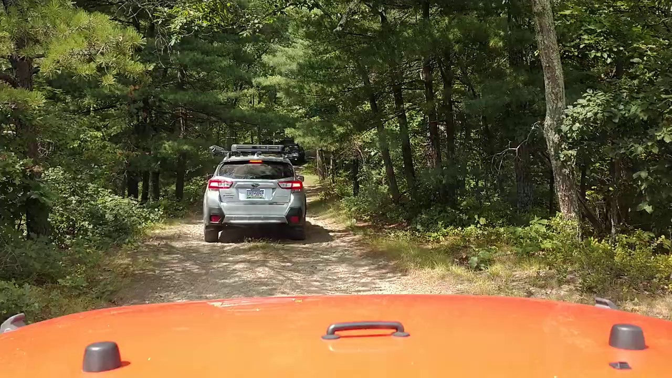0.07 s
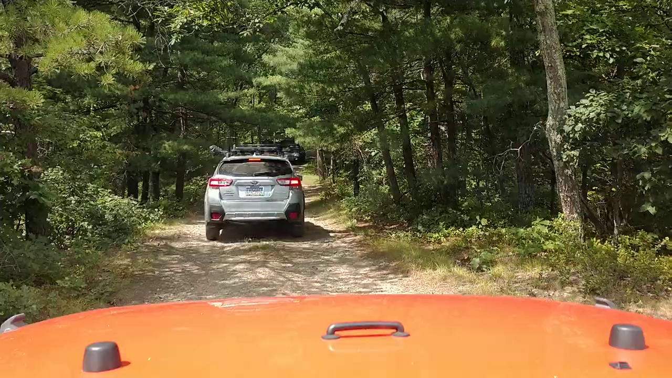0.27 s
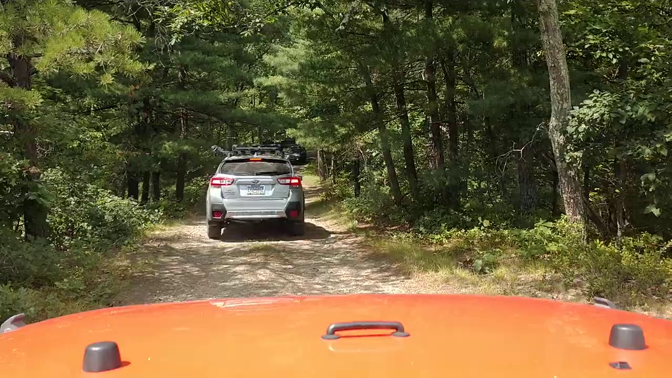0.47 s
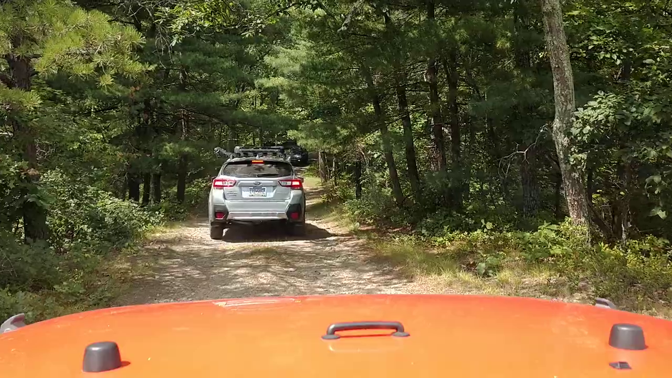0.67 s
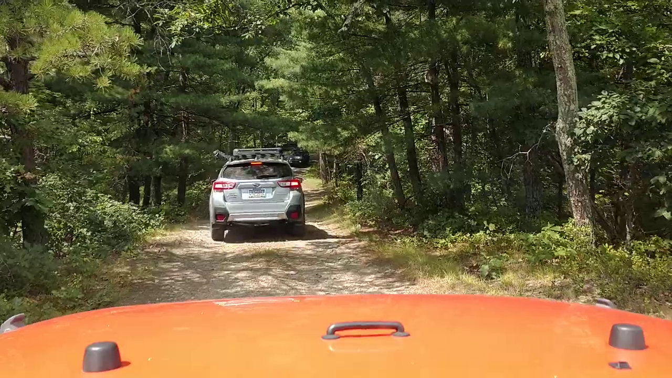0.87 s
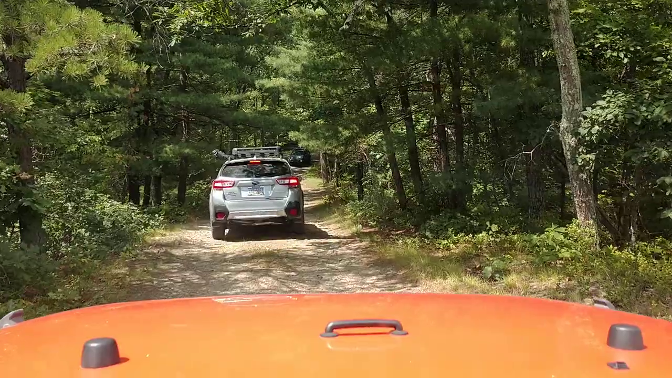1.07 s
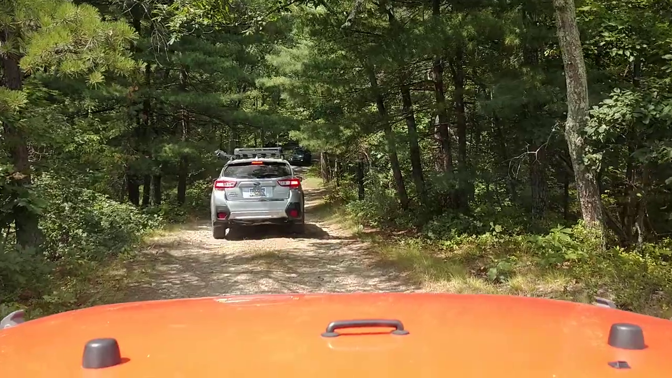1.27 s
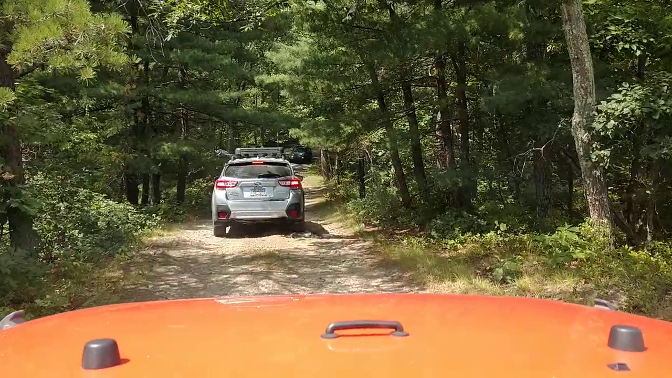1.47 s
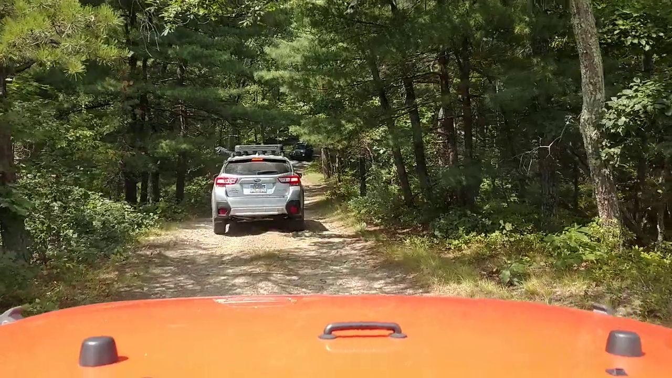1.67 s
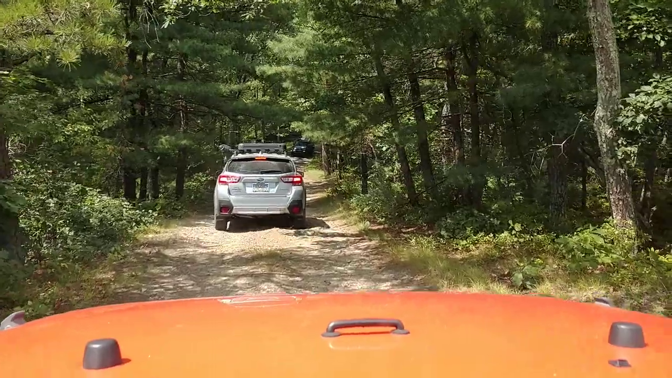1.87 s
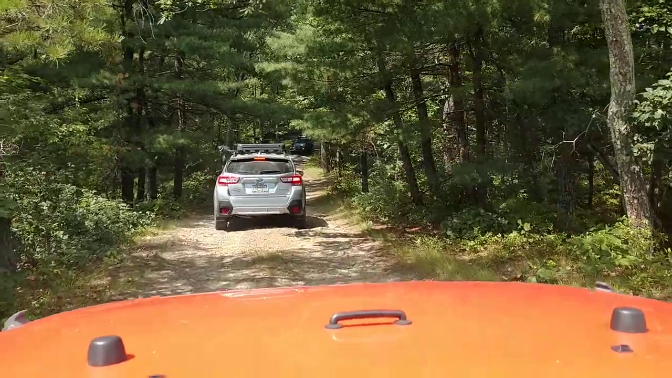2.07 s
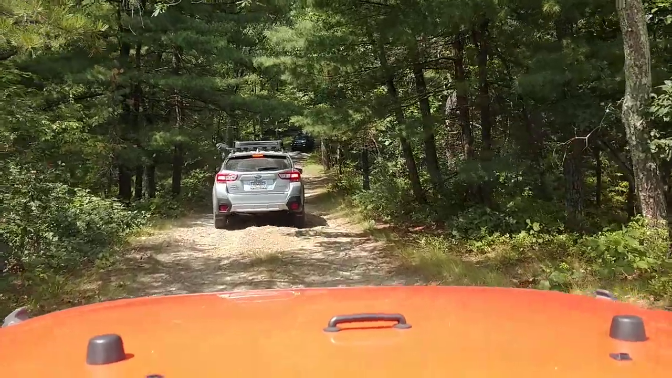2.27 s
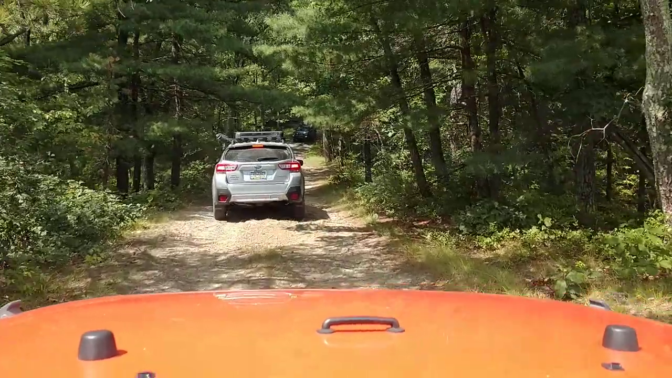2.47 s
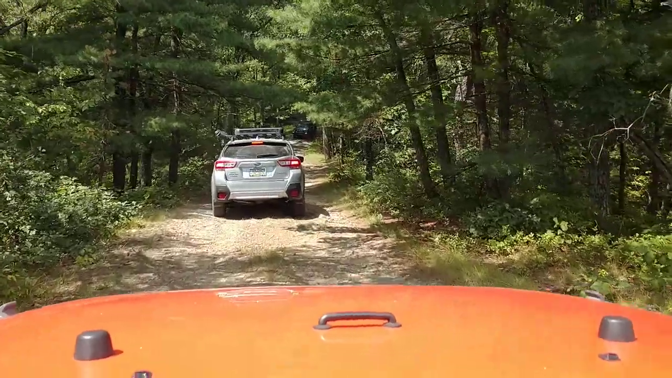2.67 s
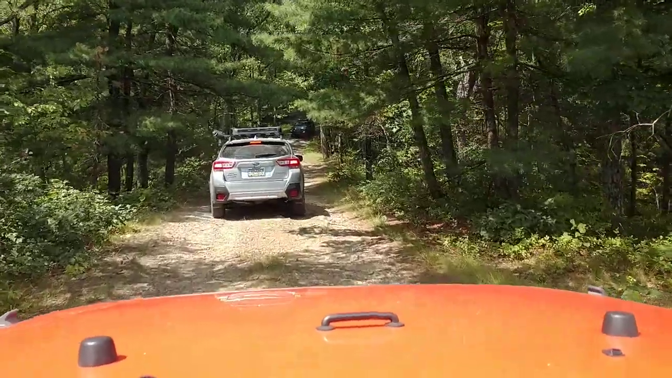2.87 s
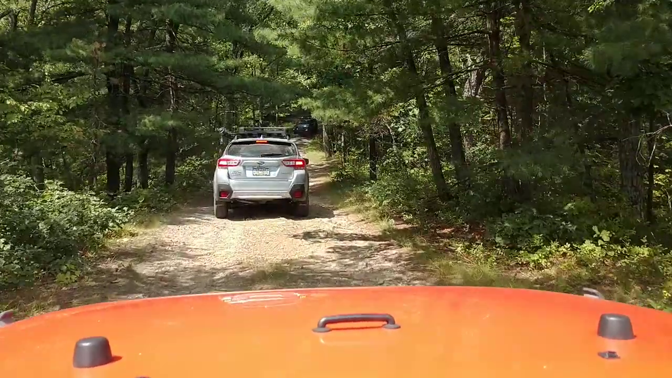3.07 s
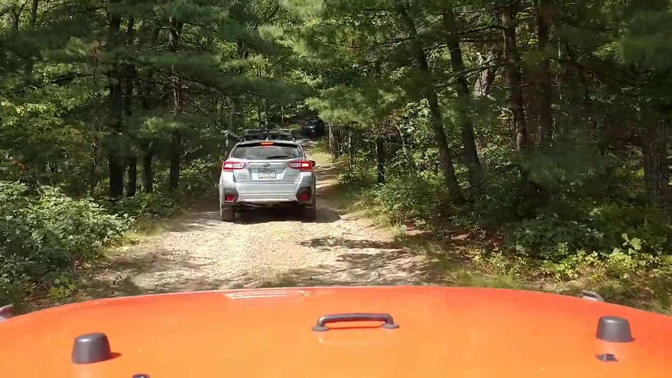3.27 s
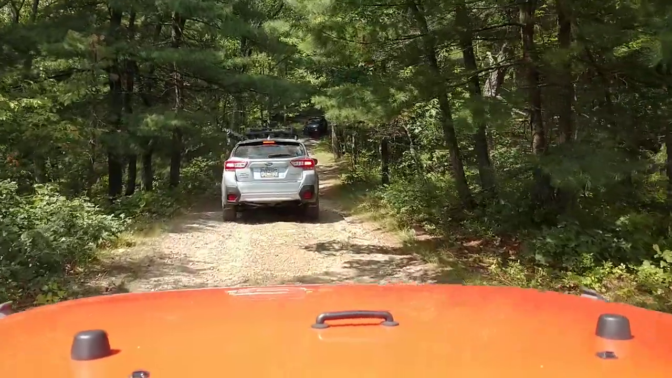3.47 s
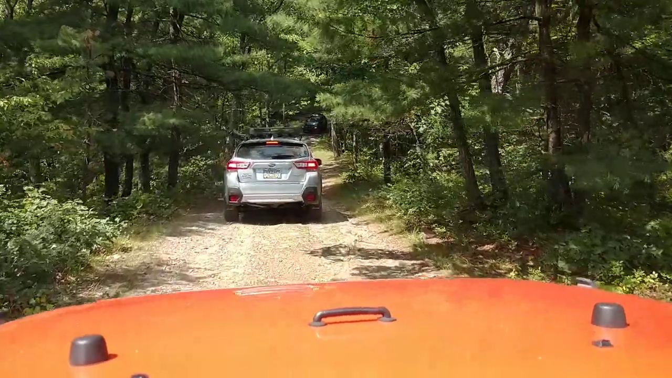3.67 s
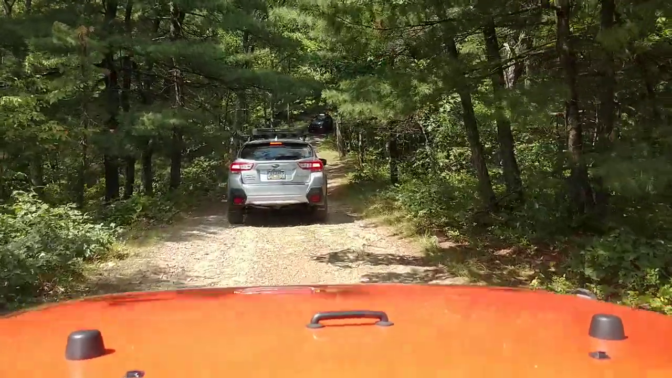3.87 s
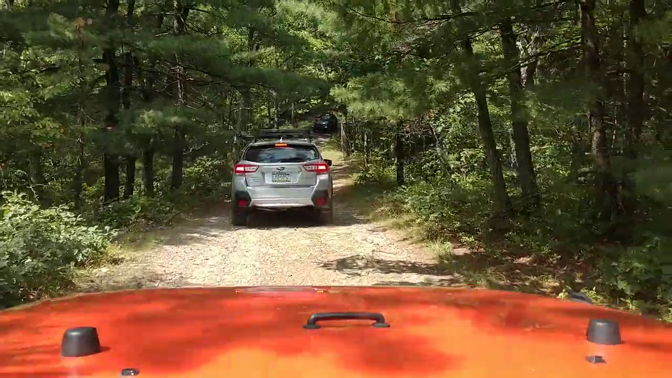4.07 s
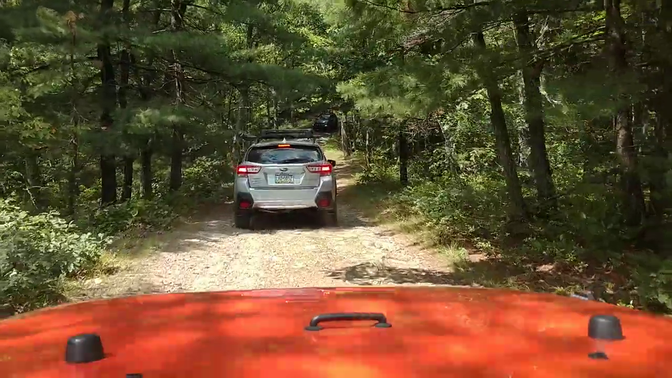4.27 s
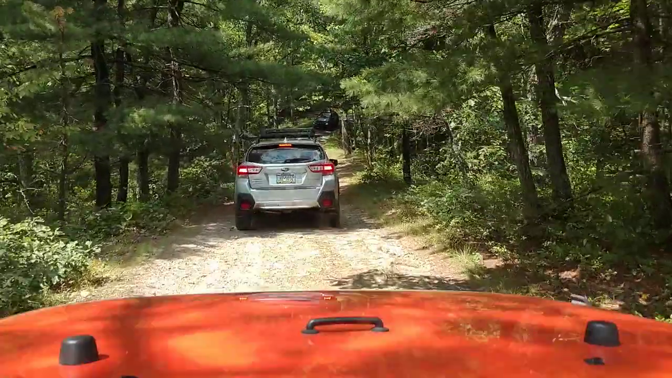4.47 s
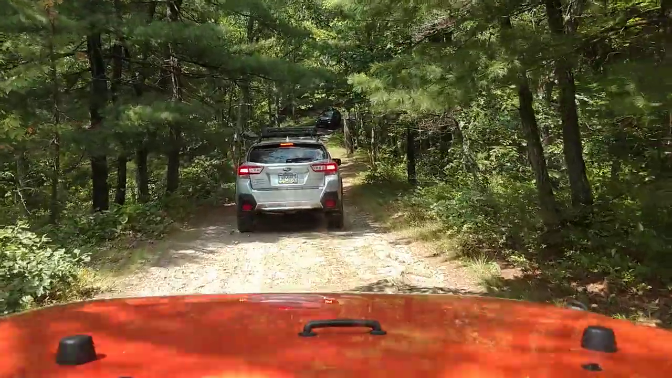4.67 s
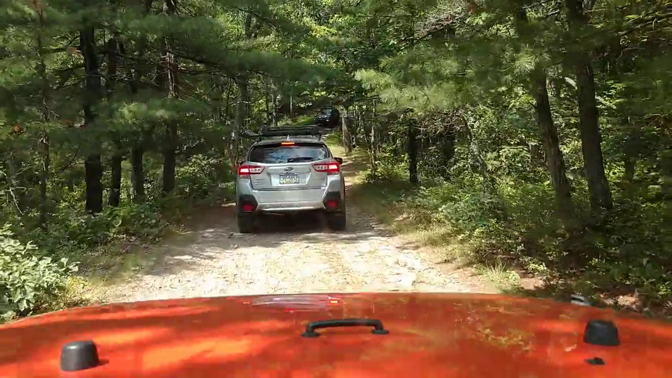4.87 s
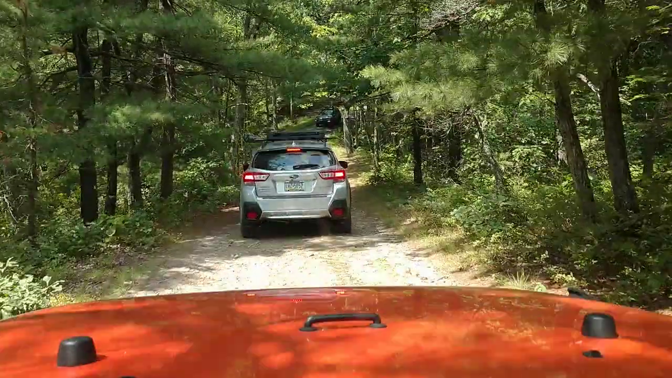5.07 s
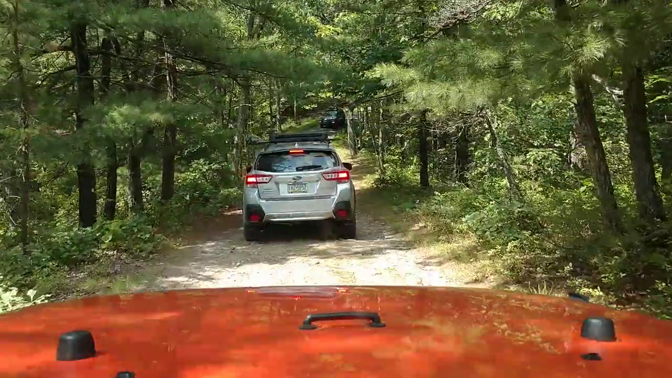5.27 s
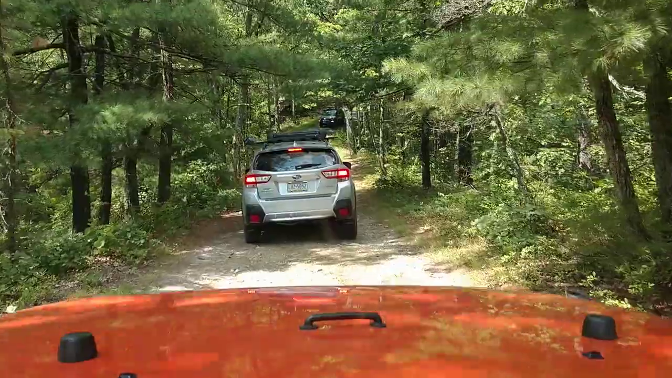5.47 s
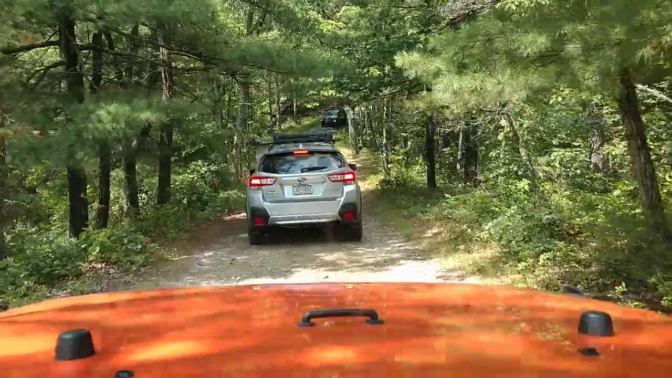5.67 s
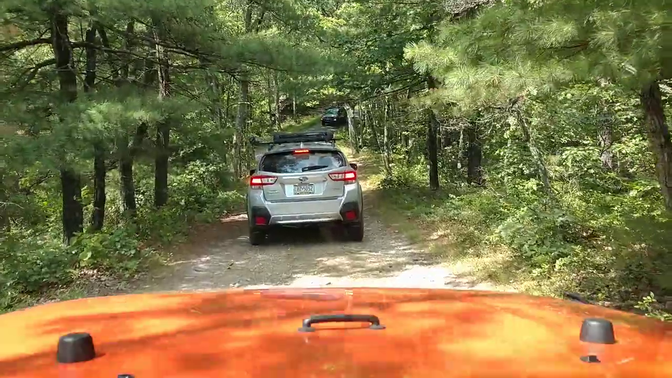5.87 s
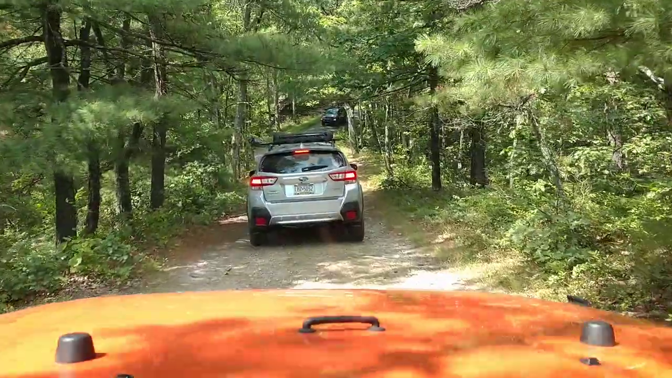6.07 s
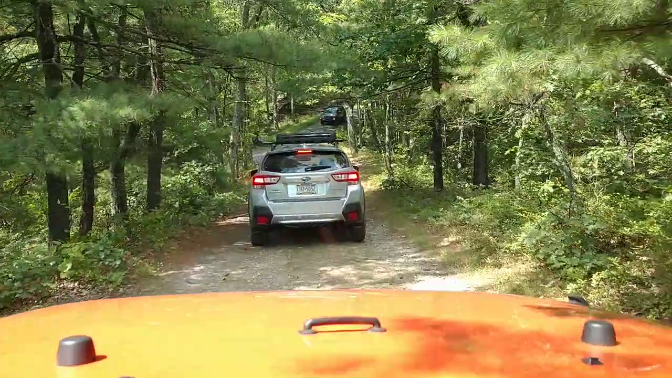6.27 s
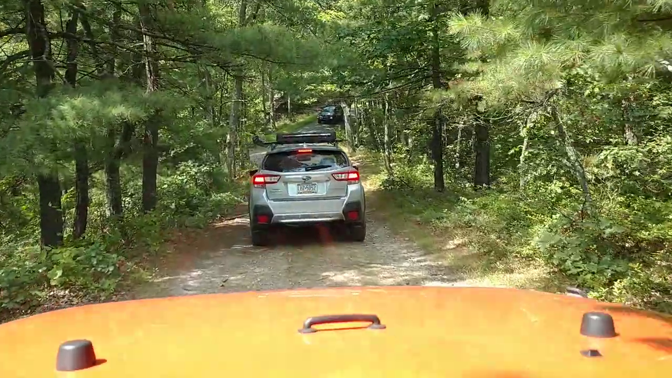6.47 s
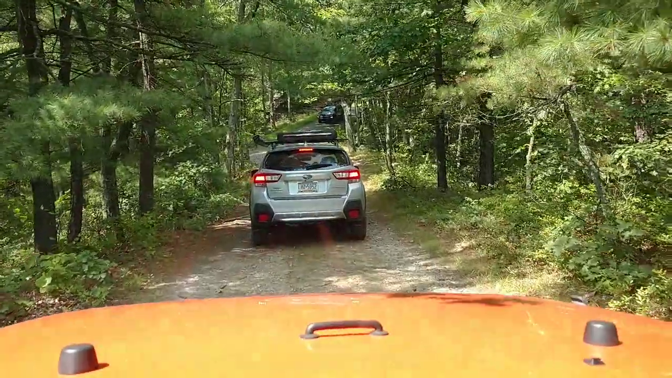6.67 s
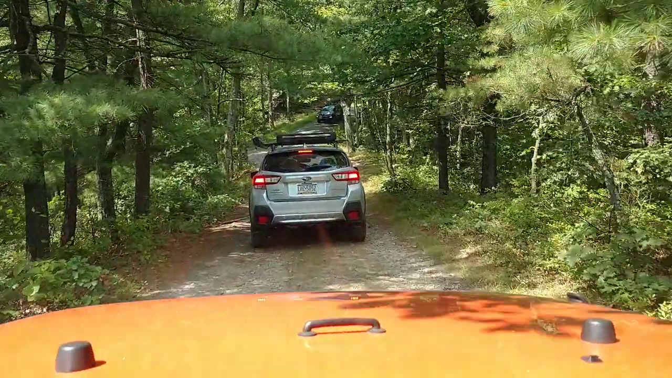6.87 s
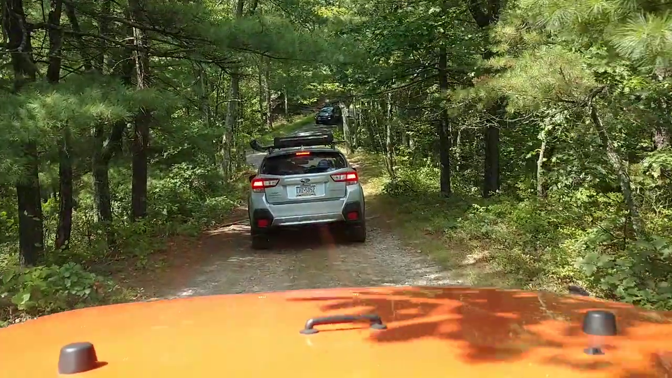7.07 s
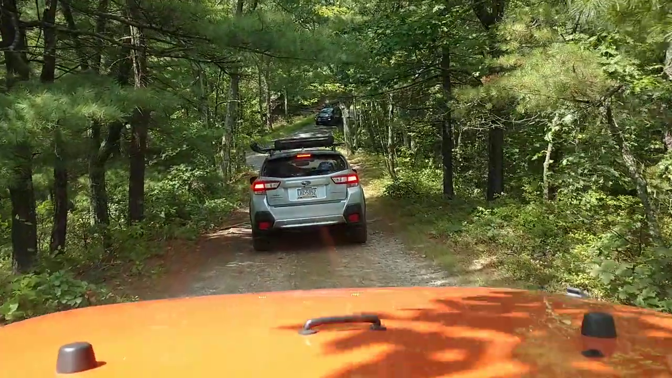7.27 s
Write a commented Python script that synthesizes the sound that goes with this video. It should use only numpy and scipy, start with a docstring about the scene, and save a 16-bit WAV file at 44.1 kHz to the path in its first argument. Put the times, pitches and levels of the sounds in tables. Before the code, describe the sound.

Two microphones aboard a slow vehicle pick up a deep, throbbing body rumble. After a near-quiet opening with small dull jolts, the engine pulls briefly and relaxes. Wheels drop into ruts with dull thuds; tyres crackle through gravel, snapping stones mostly on the left. Loud plastic clacks, hollow knocks and bright metallic rattles crowd the middle seconds, then thin out to soft jolts, light jingles and low hum.

```python
"""An off-road vehicle crawls down a dirt trail, heard close by from on board on two microphones.
The body booms and drones from shaped noise and grains; the engine's sine tones swell once out of idle.
Decaying modes make the suspension jolts, metal jingle, hollow panel knocks and rock clonks.
Shaped noise, random modes and small contacts make trim clacks, thuds, grit and snaps.
A faint even hiss lies underneath."""
import sys
import numpy as np
from scipy import signal
from scipy.fft import rfft, irfft, next_fast_len
from scipy.io import wavfile
from scipy.ndimage import uniform_filter1d

SR = 44100
rng = np.random.default_rng(int(sys.argv[2]) if len(sys.argv) > 2 else 0)


def unload_audio(sound):
    """Save the sound as a 16-bit wav file, at the path given as the first command line argument."""
    columns = np.transpose(np.atleast_2d(sound))
    # keep every value between -1 and 1, then stretch to whole-number steps
    steps = np.round(np.clip(columns, -1, 1) * 32767)
    wavfile.write(sys.argv[1], SR, steps.astype(np.int16))


N = 323253
TIME = np.arange(N) / SR


def amp(db):
    """Decibels to gain."""
    return 10 ** (np.asarray(db) / 20)


def unit(x):
    """Scales to rms 1."""
    return x / np.sqrt(np.mean(x ** 2) + 1e-20)


def read(points, hz):
    """Reads a spectrum table on a log-frequency axis."""
    f, value = np.transpose(points)
    return np.interp(np.log(hz + 1), np.log(f), value)


def curves(rows):
    """The columns of a curve table, at every sample."""
    s, *columns = np.transpose(rows)
    return [np.interp(TIME, s, c) for c in columns]


def add(mix, s, sound):
    """Mixes a stereo sound in at time s."""
    part = mix[:, round(s * SR):][:, :sound.shape[1]]
    part += sound[:, :part.shape[1]]


def noise(size=N):
    """Two channels of white noise."""
    return rng.standard_normal((2, size))


def wander(hz):
    """Slow random variation of rms 1, up to the given rate."""
    slow = np.fft.rfftfreq(N, 1 / SR) < hz
    return unit(irfft(rfft(rng.standard_normal(N)) * slow, N))


# How alike the two microphones hear each pitch: pitch_hz, correlation (-1 to 1)
MICROPHONE_LIKENESS = [(30, 0.89), (60, 0.98), (125, 0.95), (250, 0.84), (500, 0.44), (1000, -0.23),
                       (4000, 0.00015), (12000, -0.12)]


def colour(x, spectrum, tilt_db=0):
    """Gives two unrelated channels a spectrum and likeness; tilt is per octave above 600 Hz."""
    size = next_fast_len(x.shape[1])
    hz, (a, b) = np.fft.rfftfreq(size, 1 / SR), rfft(x, size)
    same = np.clip(read(MICROPHONE_LIKENESS, hz), -1, 1)
    right = same * a + np.sqrt(1 - same ** 2) * b
    gain = amp(read(spectrum, hz) + tilt_db * np.log2(np.maximum(hz, 600) / 600))
    return unit(irfft(np.array([a, right]) * gain, size)[:, :x.shape[1]])


def ring(modes, t, detune, uneven_db=3):
    """Dying modes; each blow shares its energy differently, and each microphone has its own phase."""
    hz, db, t60 = np.transpose(modes)[:, :, None]
    hz = hz * (1 + detune * rng.standard_normal(hz.shape))
    db = db + uneven_db * rng.standard_normal(hz.shape)
    likeness = np.clip(read(MICROPHONE_LIKENESS, hz), -1, 1)
    lag = np.arccos(likeness) * rng.choice([-.5, .5], hz.shape)
    fade = amp(db - 60 * t / t60)
    return np.array([(fade * np.sin(2 * np.pi * hz * t + side * lag)).sum(0) for side in (1, -1)])


def placed(sound, peak_db, pan_db):
    """Sets a hit's peak level and its side (pan_db is left minus right)."""
    return sound / abs(sound).max() * amp(peak_db + np.array([[pan_db], [-pan_db]]) / 2)


def grains(per_s, spread_db, t60):
    """Random tiny impacts of uneven size, each a dying burst of noise."""
    size = amp(spread_db * np.minimum(rng.exponential(1, N), 4)) * (rng.random(N) < per_s / SR)
    power = signal.lfilter([1], [1, -amp(-120 / (t60 * SR))], size ** 2)
    return np.sqrt(power) * noise()


def contacts(t, per_s):
    """A train of small impacts of uneven strength, at random moments."""
    return rng.standard_normal(len(t)) * (rng.random(len(t)) < per_s / SR)


def shard(t, t60, top_hz, count):
    """The ring of an irregular piece: modes scattered at random up to a top frequency."""
    hz = top_hz * (np.arange(count) + rng.random(count))[:, None] / count
    life = np.minimum(t60 * rng.uniform(.5, 1.2, (count, 1)), .08)  # t60 of each mode, at most 80 ms
    size, phase = rng.rayleigh(1, (count, 1)), rng.random((2, count, 1))
    return (size * amp(-60 * t / life) * np.sin(2 * np.pi * (hz * t + phase))).sum(1)


def stones(per_s, spread_db, t60, top_hz, count, order):
    """Random collisions among count stones of uneven size, each with order modes."""
    out, t = np.zeros((2, N)), np.arange(SR // 12) / SR
    rings = [shard(t, t60, top_hz, order) for _ in range(count)]
    which = rng.integers(0, count, N)
    size = amp(spread_db * np.minimum(rng.exponential(1, N), 3))
    for at in np.flatnonzero(rng.random(N) < per_s / SR):
        add(out, at / SR, size[at] * rings[which[at]])
    return unit(out)


def mottle(x, depth_db):
    """Narrow resonances that come and go as the points of contact shift."""
    z = signal.stft(x, nperseg=512)[2]
    field = uniform_filter1d(rng.standard_normal(z.shape[1:]), size=2, axis=0)
    field = uniform_filter1d(field, size=6, axis=1)
    field = unit(field - uniform_filter1d(field, size=9, axis=0))
    shifting = z * amp(depth_db * np.minimum(field, 1.5))
    return unit(signal.istft(shifting)[1][:, :x.shape[1]])


def swell(s, hold_s, rise_s, fall_s):
    """A power envelope: builds up to time s, holds, then dies away."""
    before, after = np.maximum(s - TIME, 0), np.maximum(TIME - s - hold_s, 0)
    return np.exp(-2 * (before / rise_s + after / fall_s))


# How hard the trail shakes the vehicle: time_s, shake_db
TRAIL_SHAKE = [(0.12, -59), (1.05, -59), (1.4, -52.5), (2.3, -47.5), (3.1, -48.5), (3.4, -42.5),
               (3.88, -46.5), (4.17, -47), (4.9, -48), (5.45, -46), (5.85, -54.5), (6.6, -53),
               (7.33, -56.5)]
# The body heaves on its springs: top_s, suspension boom_db, panel drone_db (before body()'s layer gains)
BODY_HEAVES = [(0.959, -46, -58.5), (2.28, -41.5, -66), (2.711, -43.5, -47), (3.241, -38.5, -50.5),
               (3.94, -42.5, -41), (4.424, -45, -44), (4.679, -37, -47.5), (5.291, -44, -44.5)]
HEAVE_RISE_S, HEAVE_FALL_S = 0.037, 0.033
# the panels gain DRONE_SLOPE dB for each dB of shake
DRONE_AT_REF_DB, SHAKE_REF_DB, DRONE_SLOPE = -53.5, -48, 1.24


def ride():
    """Levels of boom and drone in dB: both follow the shake, and each heave adds a swell of power."""
    shake_db, = curves(TRAIL_SHAKE)
    boom = amp(shake_db) ** 2
    drone = amp(DRONE_AT_REF_DB + DRONE_SLOPE * (shake_db - SHAKE_REF_DB)) ** 2
    for s, boom_db, drone_db in BODY_HEAVES:
        heave = swell(s, 0, HEAVE_RISE_S, HEAVE_FALL_S)
        boom = boom + amp(boom_db) ** 2 * heave
        drone = drone + amp(drone_db) ** 2 * heave
    return 10 * np.log10([boom, drone])


# Spectrum of the low boom: pitch_hz, relative level_db
BOOM_SPECTRUM = [(13, -60), (22, -24.5), (56, -7.5), (70, -4), (145, -3), (200, -12.5), (260, -16.5),
                 (440, -120)]
# Spectrum of the droning panels: pitch_hz, relative level_db
DRONE_SPECTRUM = [(100, -31), (150, -26), (200, -0.5), (260, 1), (350, -2.5), (430, -5.5), (520, -19.5),
                  (650, -27.5), (820, -47.5), (1100, -51), (2000, -37.5), (5000, -102)]


def body(boom_db=-2, drone_db=-2, hard_db=-11, pan_db=0.5, throb=.35, throb_hz=36):
    """Wheel jolts shake the body into a throbbing drone; harder jolts excite higher panel modes."""
    low_db, mid_db = ride()
    boom = colour(noise(), BOOM_SPECTRUM)
    boom /= np.sqrt(uniform_filter1d(boom[0] ** 2, size=5000))  # evens out its level
    throb_turn = 2 * np.pi * np.cumsum(throb_hz * (1 + 0.048 * wander(7.7))) / SR
    throbbing = 1 + throb * np.sin(throb_turn)
    drone = colour(grains(200, 1.7, 0.071) * throbbing, DRONE_SPECTRUM)
    drone /= np.sqrt(uniform_filter1d((drone ** 2).mean(0), size=4000))
    drone *= unit(amp(2 * wander(16)))
    hard_spectrum = [(250, -46), (380, -1.5), (500, 3.0), (600, -6.5),
                     (800, -19.0), (1400, -20.5), (4000, -80.0)]
    hard = colour(grains(120, 4.5, 0.047), hard_spectrum)
    force = amp(np.minimum(mid_db + 45.5, 0))  # the higher modes ring fully above -45.5 dB
    panels = amp(drone_db) * drone + amp(hard_db) * force * hard
    shake = amp(low_db + boom_db) * boom + amp(mid_db) * panels
    return shake * amp([[pan_db / 2], [-pan_db / 2]])


# The firing tone: time_s, firing pitch_hz, firing level_db, octave level_db (before throttle and trims)
ENGINE_FIRING = [(0.6, 32.4, -76, -75.5), (0.97, 35.13, -78, -45), (1.12, 37.8, -84, -56.5),
                 (1.42, 47, -45.5, -47.5), (1.76, 51.5, -42, -84), (1.97, 54.48, -41.5, -36),
                 (2.19, 51.4, -39, -72), (2.39, 48.23, -48, -79), (2.7, 35.7, -92, -61)]
# Pull of the engine: time_s, gain (0-1)
THROTTLE_PULL = [(.2, 0.1), (.7, 0.78), (2.4, 0.31), (2.8, 0.03)]
# Idle hum: time_s, gain
IDLE_GAIN = [(.2, 0.17), (.75, 0.39), (1.15, 0.24), (2.4, 0.062), (2.8, 1.77), (3.3, 1.4), (4.6, 1.16),
             (6, 0.64)]


def engine(tone_db=-1, octave_db=-2, fourth_db=-11, idle_db=-58, idle_hz=73):
    """Low firing orders rise and fall in pitch with one pull, crossing with a wavering idle hum."""
    hz, first_db, second_db = curves(ENGINE_FIRING)
    turn = 2 * np.pi * np.cumsum(hz * (1 + 0.0033 * wander(12.0))) / SR
    pull = amp(first_db) * (amp(tone_db) * np.sin(turn) + amp(fourth_db) * np.sin(4 * turn))
    pull += amp(second_db + octave_db) * np.sin(2 * turn)
    idle_turn = 2 * np.pi * np.cumsum(idle_hz * (1 + 0.0194 * wander(3.4))) / SR
    idle = amp(idle_db + 1.5 * wander(1.9)) * (np.sin(idle_turn) + 0.64 * np.sin(2 * idle_turn))
    (throttle,), (idling,) = curves(THROTTLE_PULL), curves(IDLE_GAIN)
    return np.sqrt(2) * (throttle * pull + idling * idle)


# Spectrum of the hiss: pitch_hz, relative level_db
HISS_SPECTRUM = [(410, -13), (700, 4), (971, -0.5), (1500, -4), (2220, -4), (7290, -9.5), (8420, -8.5),
                 (16000, -5.5)]


def hiss(level_db=-81):
    """A faint, steady bed of shaped noise."""
    return amp(level_db) * colour(noise(), HISS_SPECTRUM)


# A spring takes a sharp jolt: start_s, peak_db (before trim_db)
SPRING_JOLTS = [(0.271, -48), (0.399, -48.5), (0.641, -40.5), (0.738, -47.5), (0.87, -50), (1.071, -44.5),
                (1.149, -44.5), (1.214, -43), (1.39, -39), (3.224, -40), (5.72, -42.5), (5.938, -42.5),
                (6.038, -43.5), (6.167, -40), (6.477, -41.5), (6.539, -41.5), (6.74, -43), (6.84, -48.5),
                (7.019, -45.5)]
# Nominal modes of suspension and floor: pitch_hz, relative level_db, t60_s
SUSPENSION_MODES = [(70.4, -1, 0.16), (98, -1.5, 0.15), (146.7, -0.5, 0.22), (224.6, -3, 0.16),
                    (310.8, -7.5, 0.16)]


def jolts(trim_db=0, rise_s=0.011, pan_db=0.8):
    """A sharp bump sets the suspension and floor swinging for a few cycles."""
    out, t = np.zeros((2, N)), np.arange(SR // 4) / SR
    for s, db in SPRING_JOLTS:
        swing = ring(SUSPENSION_MODES, t, .07) * np.minimum(t / rise_s, 1)
        add(out, s, placed(swing, db + trim_db, pan_db))
    return out


# Contacts of the small metal piece: start_s, peak_db (before trim_db), left minus right pan_db
METAL_JINGLES = [(1.152, -68.5, 0), (2.755, -61, 18), (3.071, -52, 7), (3.103, -42, 2), (3.187, -44, -4),
                 (3.546, -37, -2), (3.616, -41, 1), (3.692, -48, 6), (4.376, -28.5, 3.5), (4.391, -28.5, 3),
                 (4.582, -36.5, -3), (4.742, -39.5, 7), (4.814, -44.5, 5), (4.849, -46, -15),
                 (5.34, -51, 4), (5.377, -45, 4), (5.549, -27.5, 2), (5.573, -33.5, -8), (5.688, -50, 3),
                 (5.943, -49.5, -1), (6.033, -51, 3), (6.323, -54, -3), (6.429, -59, 10), (6.487, -54, 4),
                 (6.573, -54, -7), (6.796, -51, -7), (6.968, -50, 1), (6.997, -51, -11), (7.177, -53, -3)]
# Nominal modes of the metal piece: pitch_hz, relative level_db, t60_s
METAL_MODES = [(3060, -22, .11), (3800, -18, .12), (4600, -20, .08), (8000, -4, .11), (9330, -4, .1),
               (11150, 2, .1), (11270, 1, .09), (11750, -7, .06), (13250, -2, .09)]


def jingles(trim_db=-1, scrape=2, scrape_t60=0.062, chatter=0.33, chatter_per_s=400,
            chatter_t60=0.13, rise_s=0.0016):
    """The metal piece chatters against its seat; each contact rings its modes and a few stray ones."""
    out, t = np.zeros((2, N)), np.arange(SR // 6) / SR
    for s, db, pan_db in METAL_JINGLES:
        blows = chatter * contacts(t, chatter_per_s) * amp(-60 * t / chatter_t60)
        blows[0] = 1
        seat = colour(shard(t, scrape_t60, 16000, count=32), CRACKLE_SPECTRUM)
        strike = ring(METAL_MODES, t, 0.004, uneven_db=3) + scrape * seat / abs(seat).max()
        sound = signal.fftconvolve(strike, blows[None], axes=1)[:, :len(t)] * np.minimum(t / rise_s, 1)
        add(out, s, placed(sound, db + trim_db, pan_db))
    return out


# Loose trim hits: start_s, peak_db (before trim_db), treble tilt_db per octave, t60_s of chatter and scuff
TRIM_CLACKS = [(1.339, -42.5, -1, 0.11), (1.389, -47.5, -2, 0.14), (1.756, -45.5, 0.5, 0.3),
               (1.845, -32.5, 2, 0.07), (2.129, -48, -1.5, 0.26), (2.279, -44.5, 6, 0.23),
               (3.074, -56, -6, 0.35), (3.357, -43.5, 2, 0.6), (3.739, -32.5, -5.5, 0.17),
               (3.766, -44, 0.5, 0.58), (3.897, -34, 14, 0.16), (3.917, -43, 4, 0.44),
               (4.033, -54, 11, 0.09), (4.228, -33, 22.5, 0.17), (4.261, -40.5, -10.5, 0.36),
               (4.374, -36, 6.5, 0.24), (4.422, -44.5, -1, 0.24), (4.647, -43, 2, 0.47),
               (4.853, -33.5, 8, 0.037), (5.002, -30.5, 7.5, 0.55), (5.045, -24, -1.5, 0.13),
               (5.545, -49.5, 4.5, 0.29), (5.572, -24, 11.5, 0.11), (5.633, -41.5, 10, 0.31),
               (5.972, -46, 3, 0.24), (6.028, -53.5, 1, 0.17), (6.57, -59.5, 6, 0.97),
               (6.649, -63, 5, 0.11), (7.177, -61, 2, 0.081), (7.264, -59.5, 2, 0.42),
               (7.313, -49.5, -10, 0.089)]
# Spectrum of the plastic trim: pitch_hz, relative level_db
TRIM_SPECTRUM = [(300, 2.5), (950, -5.5), (1260, -1.5), (1550, -6.5), (1900, 1.5), (2600, -1), (2800, -3),
                 (3100, -1.5), (3900, -2.5), (5500, -8.5), (7500, -10), (11000, -6.5), (16000, -30.5)]


def clacks(trim_db=-0.5, scuff=0.66, tail_db=-23, tail_t60=1.0, pan_db=0.0, bounce=0.17,
           chatter=0.44, chatter_per_s=260, ragged=0.48):
    """Plastic trim hits with short modes, chatters to rest and scuffs among shifting resonances."""
    out, t = np.zeros((2, N)), np.arange(SR // 2) / SR
    for s, db, tilt_db, t60 in TRIM_CLACKS:
        fade = amp(-60 * t / t60) + amp(tail_db - 60 * t / tail_t60) * (1 - t / t[-1])
        piece = shard(t[:SR // 16], .04, 16000, count=96) / np.sqrt(96)
        blows = chatter * contacts(t, chatter_per_s) * fade
        blows[0] = 1
        blows[int(rng.uniform(0.0048, 0.016) * SR)] = bounce
        slow = unit(uniform_filter1d(rng.standard_normal(len(t)), size=300))
        lumps = unit(np.exp(ragged * slow))
        rubbing = mottle(noise(len(t)), 7)
        hit = signal.fftconvolve(piece, blows[None], axes=1)[:, :len(t)]
        hit = hit + scuff * fade * lumps * rubbing
        hit = np.pad(hit, ((0, 0), (SR // 500, 0)))  # 2 ms of room before the hit, taken off its start
        add(out, s - 1 / 500, placed(colour(hit, TRIM_SPECTRUM, tilt_db), db + trim_db, pan_db))
    return out


# A tyre rolls through loose stones: start_s, length_s, grind_db, crackle_db
STONE_PATCHES = [(1.853, 0.083, -57, -58.5), (2.43, 0.4, -72, -67), (3.091, 0.12, -74.5, -59),
                 (3.313, 0.25, -64, -64.5), (3.69, 0.046, -60, -54.5), (3.895, 0.16, -58.5, -59.5),
                 (4.38, 0.35, -59, -58.5), (4.7, 0.55, -67.5, -66.5), (5.246, 0.21, -66.5, -70.5)]
PATCH_RISE_S, PATCH_FALL_S = 0.017, 0.069
# packed dirt between the patches, relative to the shake
DIRT_GRIND_DB, DIRT_CRACKLE_DB, DIRT_FROM_S = -33.5, -31.5, 1.656


def ground():
    """Levels of grinding and crackle in dB: faint on packed dirt, with a swell in each stone patch."""
    shake_db, = curves(TRAIL_SHAKE)
    dirt = amp(shake_db) ** 2 * swell(DIRT_FROM_S, N / SR, PATCH_RISE_S, PATCH_FALL_S) + 1e-16
    grind, crackle = amp(DIRT_GRIND_DB) ** 2 * dirt, amp(DIRT_CRACKLE_DB) ** 2 * dirt
    for s, length, grind_db, crackle_db in STONE_PATCHES:
        patch = swell(s, length, PATCH_RISE_S, PATCH_FALL_S)
        grind = grind + amp(grind_db) ** 2 * patch
        crackle = crackle + amp(crackle_db) ** 2 * patch
    return 10 * np.log10([grind, crackle])


# Spectrum of grinding stones: pitch_hz, relative level_db
GRIND_SPECTRUM = [(300, 8), (550, -5.5), (800, 0.5), (1000, 2), (1250, -1.5), (1500, -3.5), (2100, -4.5),
                  (3000, -12), (4500, -11.5), (8000, -7.5), (16000, -49)]
# Spectrum of fine crackle, also of snaps and the jingle's scrape: pitch_hz, relative level_db
CRACKLE_SPECTRUM = [(800, -43), (2500, -41), (4000, -25), (5500, -9), (8000, 0), (10500, 5.5), (12500, 1),
                    (14000, -6.5), (16000, -3.5)]


def grit(grind_db=0, crackle_db=0, pan_db=1.5, rub=0.56, fizz=0.24, ticks=0.12, clump_db=3.0):
    """Stones grind and clink under the tyres, and fine grit crackles, both in clumps."""
    coarse_db, fine_db = ground()
    grind = stones(650, 3.3, 0.1, 5000, count=120, order=7) + rub * unit(grains(200, 2.4, 0.12))
    grind = mottle(grind, 6.5)
    fine = stones(260, 3.5, .035, 16000, count=80, order=20)
    fine += fizz * mottle(grains(230, 4.0, 0.034), 7.7)
    fine += ticks * unit(grains(150, 25, 0.001))
    both = amp(coarse_db + grind_db) * colour(grind, GRIND_SPECTRUM)
    both += amp(fine_db + crackle_db) * colour(fine, CRACKLE_SPECTRUM)
    return both * unit(amp(clump_db * wander(30))) * amp([[pan_db / 2], [-pan_db / 2]])


# A wheel drops into a rut: start_s, peak_db (before trim_db), t60_s
RUT_THUDS = [(1.759, -41.5, 0.22), (2.423, -43, 1), (2.522, -38.5, 0.35), (2.659, -43, 0.8),
             (2.812, -41.5, 0.45), (3.061, -33, 0.39), (3.176, -38, 0.35), (3.606, -35.5, 0.29),
             (3.849, -39.5, 0.35), (3.925, -45, 0.8), (4.5, -40.5, 0.85), (5.621, -44, 0.46),
             (6.209, -55.5, 0.74), (6.65, -47, 0.4), (6.928, -44.5, 0.49), (6.975, -42, 0.23)]
# Spectrum of the body's judder: pitch_hz, relative level_db
THUD_SPECTRUM = [(90, -21), (170, 4.5), (260, -3.5), (350, 3.5), (480, -4), (600, -7.5), (690, -23),
                 (800, -43), (1500, -68), (4000, -100)]


def thuds(trim_db=-1, rise_s=0.0061, pan_db=-3.0):
    """The soft tyre spreads each blow in time, so the body answers with a dull judder."""
    out, t = np.zeros((2, N)), np.arange(SR // 3) / SR
    for s, db, t60 in RUT_THUDS:
        judder = colour(noise(len(t)), THUD_SPECTRUM) * np.minimum(t / rise_s, 1) * amp(-60 * t / t60)
        add(out, s, placed(judder, db + trim_db, pan_db))
    return out


# Blows on the hollow panel: start_s, peak_db (before trim_db), nominal chatter_s
PANEL_KNOCKS = [(1.856, -36, 0.018), (1.915, -41.5, 0.013), (2.545, -36, 0.0077), (2.638, -43.5, 0.0082),
                (3.368, -35.5, 0.0097), (3.387, -33.5, 0.026), (3.665, -49, 0.011), (3.768, -36.5, 0.011),
                (4.052, -34, 0.024), (4.259, -44.5, 0.0091), (4.424, -31.5, 0.0098), (4.743, -27, 0.019),
                (5.223, -27.5, 0.003), (5.311, -28, 0.017), (5.463, -43.5, 0.0052), (6.747, -50, 0.0038),
                (6.976, -32, .02)]
# Nominal modes of the hollow panel: pitch_hz, relative level_db, t60_s
PANEL_MODES = [(397.2, -2.5, 0.17), (436, 11.5, 0.023), (478.5, -9, 0.13), (612, -11, 0.15),
               (761.5, -8.5, 0.081), (816, -1, 0.084), (1244, -18, 0.12), (1890, -12.5, 0.027)]


def knocks(trim_db=-1, rebound=0.57, pan_db=3, soft_hz=1400, tail_db=-20, tail_t60=0.38):
    """The panel strikes a padded stop and chatters briefly; the cabin answers."""
    out, t = np.zeros((2, N)), np.arange(SR // 4) / SR
    cabin_spectrum = [(200, -25.0), (400, 10.0), (620, -7.5), (820, 1.5),
                      (1050, -10.5), (1270, -7.5), (1600, -32.0), (4000, -16.5)]
    padding = signal.butter(3, soft_hz, fs=SR, output="sos")
    for s, db, chatter in PANEL_KNOCKS:
        blows = np.zeros(len(t))
        blows[0] = 1
        at = np.arange(1, 4) / 3 * abs(chatter) * rng.uniform(.8, 1.2, 3)
        strength = rebound * min(abs(chatter) / 0.023, 1)  # shorter chatter rebounds more weakly
        blows[(at * SR).astype(int) + 1] = strength * rng.uniform(0.22, 1.6, 3)
        panel = ring(PANEL_MODES, t, 0.013, uneven_db=2.5)
        sound = signal.fftconvolve(panel, blows[None], axes=1)[:, :len(t)]
        cabin = mottle(colour(noise(len(t)), cabin_spectrum), 5)
        sound += abs(sound).max() * amp(tail_db - 60 * t / tail_t60) * cabin
        sound *= np.minimum(t / .003, 1)
        add(out, s, placed(signal.sosfilt(padding, sound), db + trim_db, pan_db))
    return out


# Larger stones snap under the left tyres: start_s, peak_db (before trim_db and pan)
STONE_SNAPS = [(1.912, -39), (2.297, -39.5), (2.408, -39.5), (2.778, -39), (3.327, -33.5), (3.351, -29.5),
               (3.377, -48), (3.395, -30.5), (3.429, -33.5), (3.47, -33), (3.765, -38), (3.919, -29),
               (3.944, -38), (3.985, -40), (4.487, -31), (4.555, -34), (4.57, -40), (4.673, -36),
               (4.699, -37), (4.908, -45.5), (5.316, -37), (5.464, -39), (5.486, -35.5), (5.506, -34.5),
               (5.748, -42), (5.772, -38.5), (5.785, -39), (5.816, -37.5)]


def snaps(trim_db=1, split_db=-8, tail_db=-22, tail_t60=0.27, pan_db=11):
    """A very short crack, a smaller split just after it and a spray of crumbs."""
    out, t = np.zeros((2, N)), np.arange(SR // 6) / SR
    crack = amp(-60 * t / .004)
    for s, db in STONE_SNAPS:
        split = amp(split_db) * np.roll(crack, rng.integers(50, 250))
        crumbs = amp(tail_db - 60 * t / tail_t60)
        burst = np.pad(noise(len(t)) * (crack + split + crumbs), ((0, 0), (SR // 2000, 0)))
        add(out, s, placed(colour(burst, CRACKLE_SPECTRUM), db + trim_db, pan_db))
    return out


# A rock shifts under a tyre: start_s, peak_db (before trim_db), nominal pitch_hz
ROCK_CLONKS = [(2.475, -56.5, 1428), (2.7, -59, 1070), (3.068, -47, 610), (3.172, -58, 990),
               (3.494, -48.5, 796), (3.595, -49, 902), (3.767, -38.5, 977), (4.186, -45, 1137),
               (6.574, -60.5, 826), (6.928, -59, 1303), (7.263, -56, 1194)]


def clonks(trim_db=-2, t60=0.088, rise_s=0.0037, spread=0.0974, pan_db=2.0, chatter=1.0,
           chatter_per_s=300, chatter_t60=0.13):
    """Each rock rocks in its seat and rings a cluster of short modes about its own hollow pitch."""
    out, t = np.zeros((2, N)), np.arange(SR // 5) / SR
    for s, db, hz in ROCK_CLONKS:
        cluster = [(hz, 0, t60), (hz * (1 - spread), -4, t60),
                   (hz * (1 + spread), -4, t60), (hz * 1.6, -12, t60)]
        blows = chatter * contacts(t, chatter_per_s) * amp(-60 * t / chatter_t60)
        blows[0] = 1
        sound = signal.fftconvolve(ring(cluster, t, 0.0296), blows[None], axes=1)[:, :len(t)]
        add(out, s, placed(sound * np.minimum(t / rise_s, 1), db + trim_db, pan_db))
    return out


def scene():
    """Everything heard on board, over the hiss."""
    vehicle = body() + engine() + hiss() + jolts()
    loose_parts = jingles() + clacks() + knocks()
    trail = grit() + thuds() + snaps() + clonks()
    return vehicle + loose_parts + trail


START_S, FADE_S, EDGE_HZ = .09, 0.016, 16000


def record(dry):
    """Silence at first, then a quick fade in; a low-pass limits the treble."""
    opened = dry * np.clip((TIME - START_S) / FADE_S, 0, 1)
    lowpass = signal.firwin(255, EDGE_HZ, window=("kaiser", 8), fs=SR)
    return signal.oaconvolve(opened, lowpass[None], "same")


dry = scene()
out = record(dry)
unload_audio(out)
```